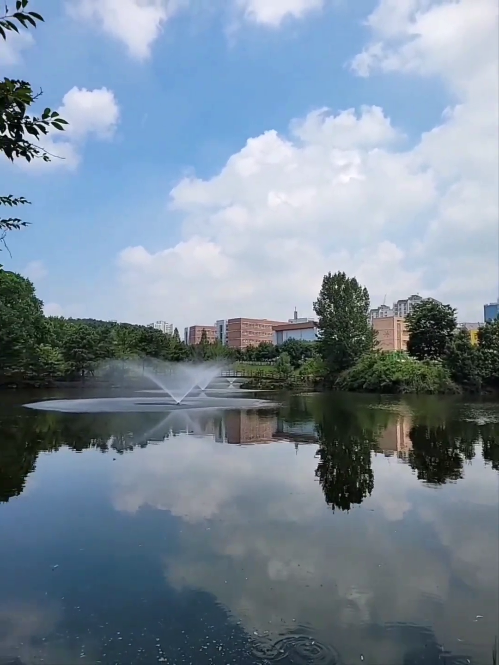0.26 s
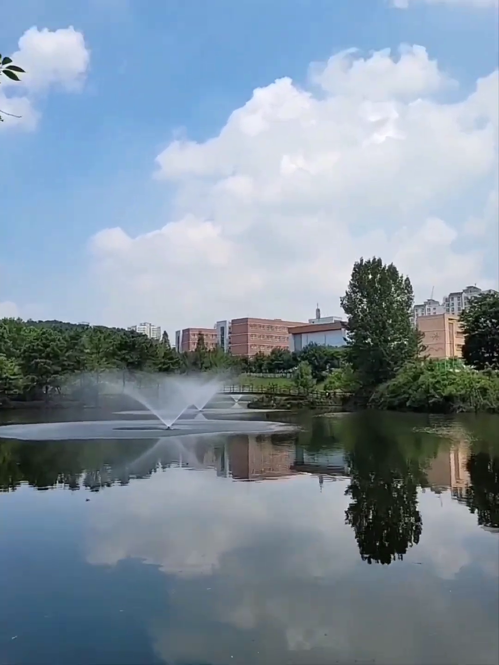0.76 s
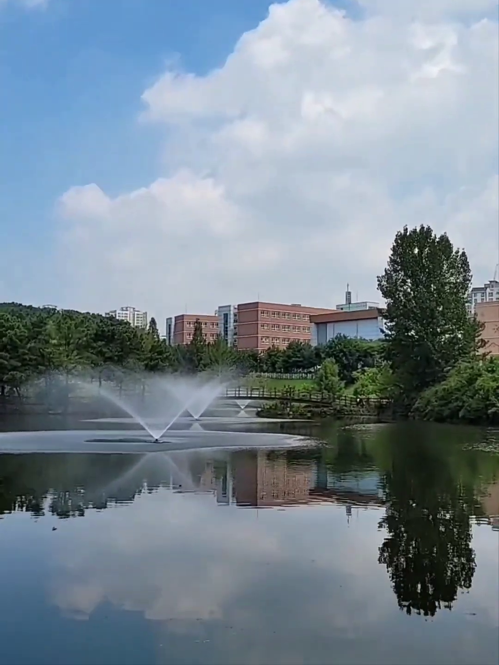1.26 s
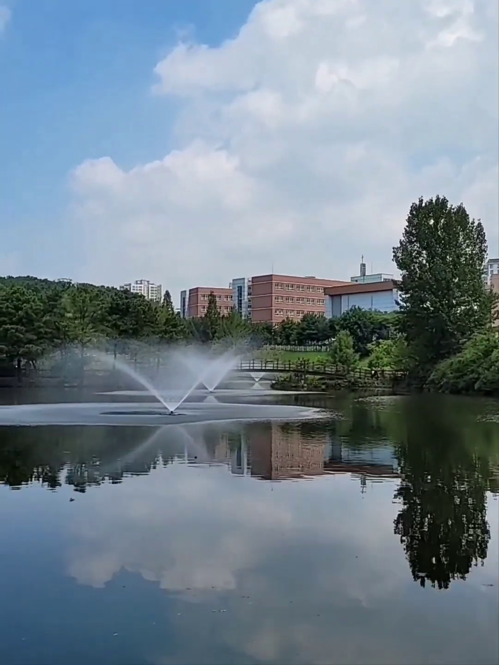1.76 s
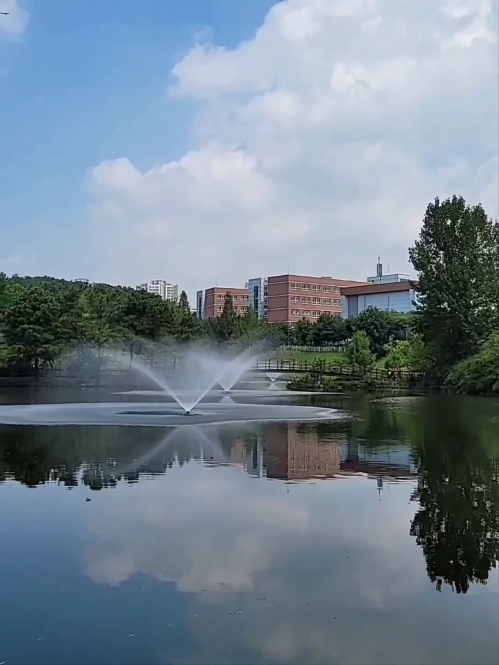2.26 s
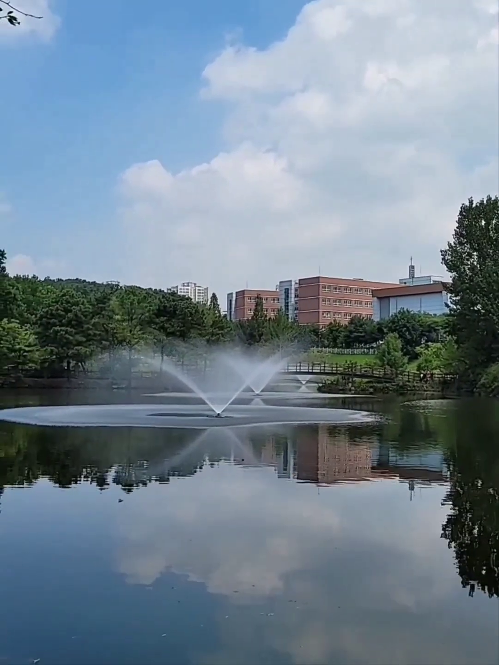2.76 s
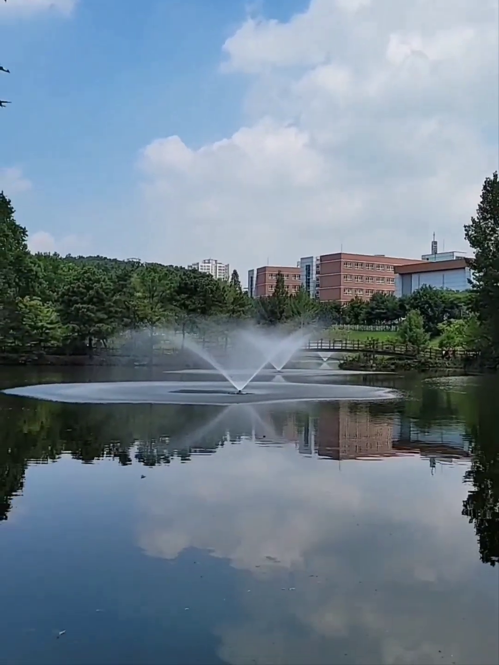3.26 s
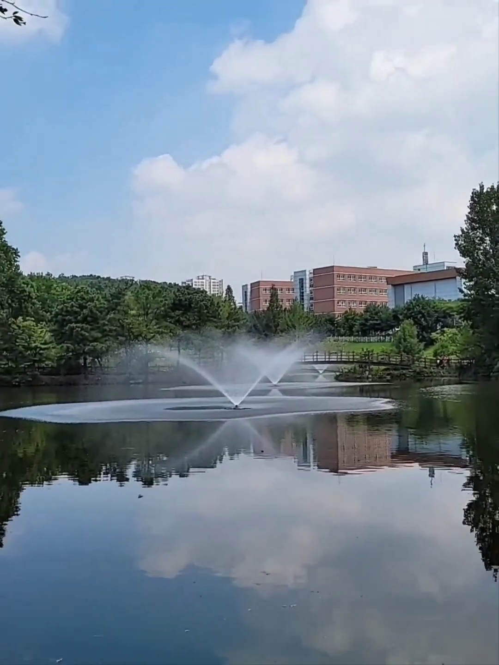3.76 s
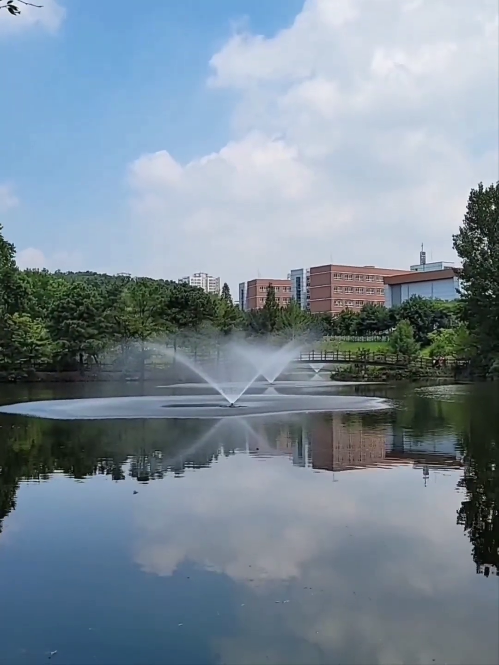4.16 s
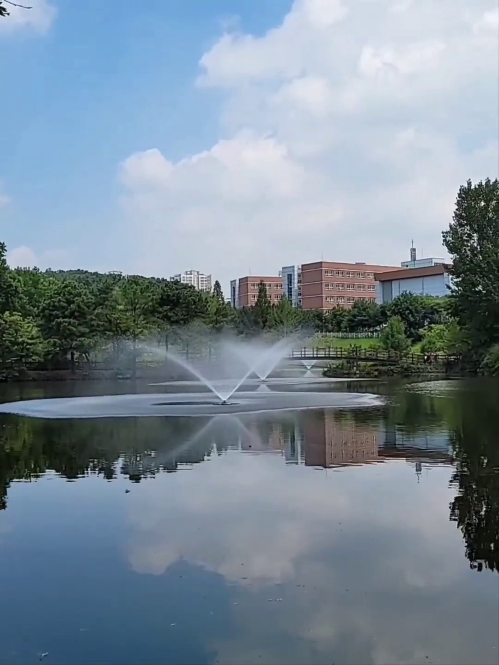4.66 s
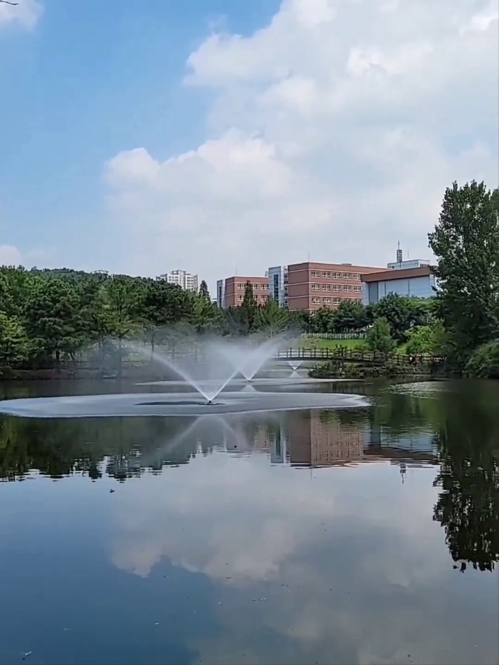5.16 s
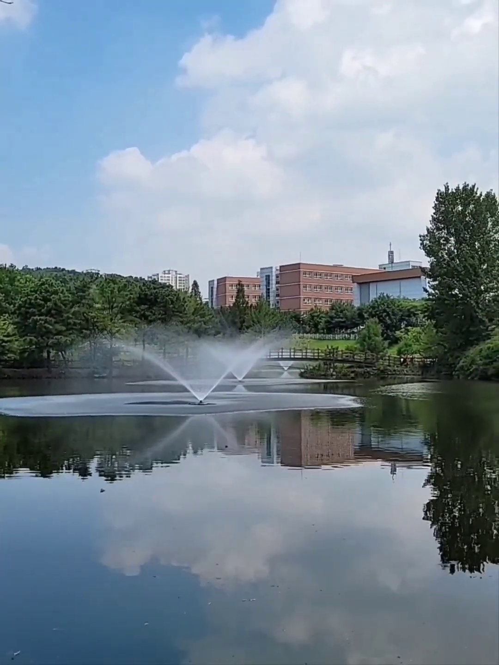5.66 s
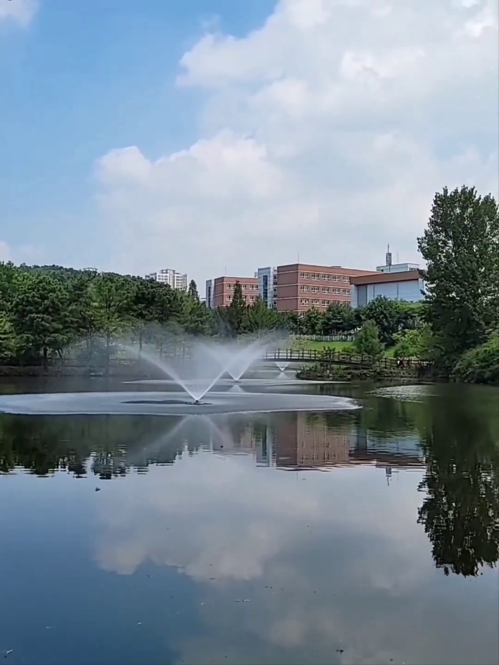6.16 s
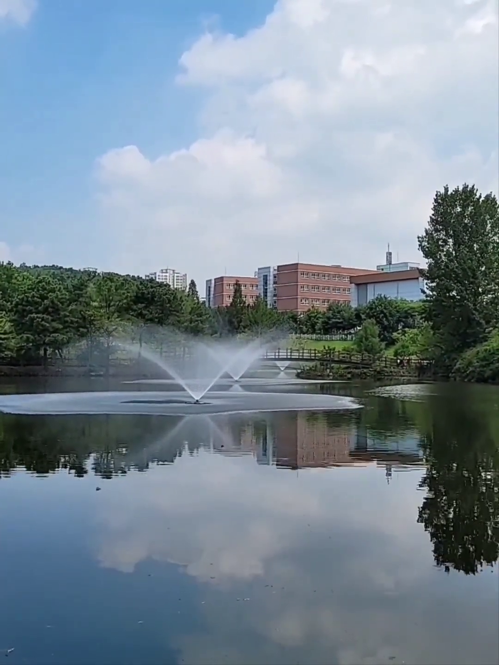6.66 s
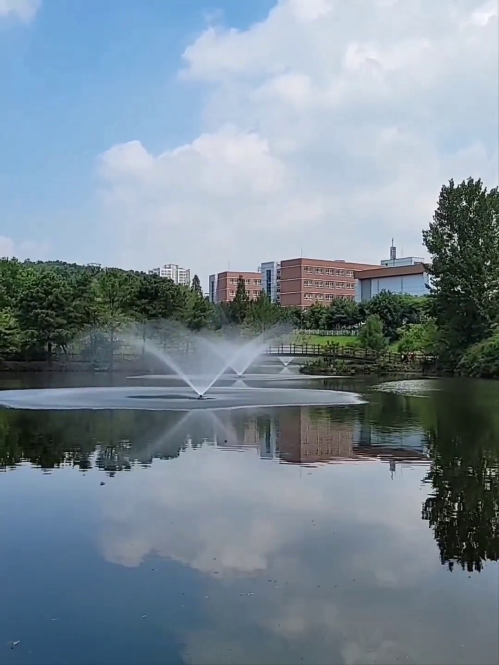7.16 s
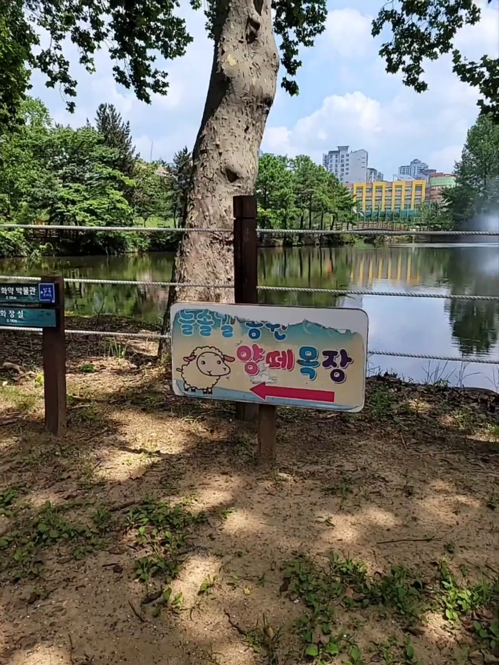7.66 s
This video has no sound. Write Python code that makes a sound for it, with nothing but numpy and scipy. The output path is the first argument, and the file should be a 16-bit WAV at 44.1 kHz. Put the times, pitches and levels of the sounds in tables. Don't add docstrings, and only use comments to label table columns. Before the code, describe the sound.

Outdoors at a summer pond, a close cicada rasps harshly and brightly, then becomes more ringing and pulsed, slows and stops after about six seconds. Far cicadas, soft fountain hiss, a low pump hum and town rumble remain, with wind thumps on a phone-like microphone. A short silence follows, then stronger leafy air and a quick run of dry twig cracks.

```python
import sys
import numpy as np
from scipy import signal
from scipy.fft import rfft, irfft
from scipy.io import wavfile
from scipy.ndimage import uniform_filter1d

SR = 44100
rng = np.random.default_rng(int(sys.argv[2]) if len(sys.argv) > 2 else 0)


def bounce(signal):
    frames = np.transpose(np.atleast_2d(signal))
    limited = np.clip(frames, -1, 1)
    pcm = np.round(limited * 32767).astype(np.int16)
    wavfile.write(sys.argv[1], SR, pcm)


def nominal_scale(level):
    x = np.asarray(level, float) / 20
    return 10 ** x


N = 349272
CUT_S, RESUME_S = 7.508, 7.651


def in_time(rows):
    s, *columns = np.transpose(rows)
    return [np.interp(np.arange(N) / SR, s, c) for c in columns]


def rms_one(x):
    return x / np.sqrt(np.mean(x ** 2) + 1e-20)


def drift(rate_hz):
    r = np.exp(-80 * np.pi * rate_hz / SR)
    slow = signal.lfilter([1], [1, -2 * r, r * r], rng.standard_normal(N // 40 + 2002))[2000:]
    return np.interp(np.arange(N) / 40, np.arange(len(slow)), rms_one(slow))


def coloured(x, spectrum):
    hz, db = np.transpose(spectrum)
    bins_hz = np.fft.rfftfreq(N, 1 / SR) + 1
    gain_db = np.interp(np.log(bins_hz), np.log(hz), db, left=-90, right=-90)
    return rms_one(irfft(rfft(x) * nominal_scale(gain_db), N))


def resonate(x, hz, width_hz):
    r = np.exp(-np.pi * width_hz / SR)
    poles = [1, -2 * r * np.cos(2 * np.pi * hz / SR), r * r]
    return signal.lfilter([(1 - r * r) / 2, 0, (r * r - 1) / 2], poles, x + 1e-18)


def puffs(events, cycles):
    out = np.zeros(N)
    for (s, db, hz), phase in zip(events, rng.uniform(0, 2 * np.pi, len(events))):
        i = np.arange(int((s - .05) * SR), min(int((s + .05) * SR), N))
        turns = hz * (i / SR - s)
        out[i] += nominal_scale(db) * np.exp(-(turns / cycles) ** 2) * np.cos(2 * np.pi * turns + phase)
    return out


SONG_END_S = 6.255
PULSES_DB = [4, -1.5, 3, -3, -5, -11]
RIBS_DB = [0, -1.5, -4]


def rib_clicks():
    t = np.arange(N) / SR
    tiring_s, settle_s = 3.0, (3.3, 4.7)
    tired = np.clip((t - tiring_s) / (SONG_END_S - tiring_s), 0, 1)
    cycles_hz = 45.7 - 10.2 * tired ** 4.0
    turns = np.cumsum(cycles_hz * (1 + .003 * drift(2.5))) / SR
    beat = np.arange(int(turns[-1]) * 17)
    pulse = beat % 17 // 3
    rib = beat % 17 % 3
    start = np.interp((beat - rib) / 17, turns, np.arange(N))
    loose_ms = np.interp(t, settle_s, (.065, .011))[start.astype(int)]
    rib_hz = 780
    at = start + SR * (rib / rib_hz + loose_ms / 1000 * rng.standard_normal(len(beat)))
    at = np.clip(at, 0, N - 1).astype(int)
    contrast = np.interp(t[at], settle_s, (.55, 1.15))
    click_db = np.array(PULSES_DB)[pulse] * contrast + np.array(RIBS_DB)[rib]
    force = np.zeros(N)
    force[at] = nominal_scale(click_db) * (at < SONG_END_S * SR)
    return force, at, pulse


# centre in Hz, width in Hz, level in dB.
TYMBAL = [(3531, 490, -4.5), (4295, 1030, -4), (5135, 1230, 1), (6240, 740, -6), (6780, 1600, -1)]
# centre in Hz, width in Hz, level in dB.
OVERTONES = [(9140, 1400, -4), (10660, 1550, -0.5), (11320, 1200, -0.5), (12700, 3000, -15)]
# centre in Hz, width in Hz, level in dB.
BELLY = [(5460, 330, 0), (5180, 160, -7), (5680, 100, -10), (9300, 80, -14), (6270, 80, -14),
         (3960, 90, -16), (7150, 80, -16), (8050, 100, -18), (3340, 70, -17)]
# time in seconds, level in dB.
EFFORT = [(0, -28), (1.5, -29), (2.2, -27.5), (3.1, -29), (3.6, -28.5), (4.2, -31), (4.9, -33), (6.25, -33)]


def cicada(scatter_db, scatter_s):
    t = np.arange(N) / SR
    force, at, pulse = rib_clicks()
    keep = np.exp(-2 / (scatter_s * SR))
    power = signal.lfilter([1 - keep], [1, -keep], force ** 2, zi=[np.mean(force ** 2)])[0]
    lingering = np.sqrt(power)

    def struck(modes, spread, wet_db):
        out = 0
        for hz, width_hz, db in modes:
            noise = rng.standard_normal(N)
            habit = np.zeros(N)
            habit[at] = rng.choice([-1, 1], 6)[pulse]
            blows = force * (habit + spread * noise) + nominal_scale(wet_db) * lingering * noise
            once = resonate(blows, hz, 1.5 * width_hz)
            out = out + nominal_scale(db) * rms_one(resonate(once, hz, 1.5 * width_hz))
        return rms_one(out)

    settle_s = (3.3, 4.7)
    ring_db = np.interp(t, settle_s, (-13, -1.5))
    overtone_db = np.interp(t, settle_s, (-5.5, -5))
    effort_db, = in_time(EFFORT)
    song = struck(TYMBAL, 0.44, scatter_db)
    song = song + nominal_scale(overtone_db) * struck(OVERTONES, 0.58, scatter_db)
    song = song + nominal_scale(ring_db) * struck(BELLY, 0.13, wet_db=-15)
    high_pass = signal.butter(6, 3100, "high", fs=SR, output="sos")
    return signal.sosfilt(high_pass, song * nominal_scale(effort_db - 1.5))


# start in seconds, peak in dB, pitch in Hz, length in seconds, woody share.
TWIG = [
    (7.804, -31, 1950, .002, 1.2),
    (7.8325, -27, 12000, .003, .3),
    (7.8355, -26, 5500, .003, .4),
    (7.843, -24, 2200, .0007, 1.5),
    (7.857, -27, 6000, .0007, .4),
    (7.860, -21, 4600, .0015, 1.2),
    (7.8625, -11, 6300, .0014, 1.6),
    (7.8643, -14, 4600, .002, .3),
    (7.872, -27, 4700, .003, .2),
]


def twig():
    out = np.zeros(N)
    t = np.arange(int(.03 * SR)) / SR
    for s, db, hz, length_s, woody in TWIG:
        burst = rng.standard_normal(len(t)) * np.exp(-t / max(length_s, 3e-4)) * (1 - np.exp(-t / 0.00065))
        centre = 1.7 * resonate(burst, hz, 1800)
        low = woody * resonate(burst, 2000, 1500)
        top = 1.5 * (hz > 3000) * resonate(burst, 12500, 4000)
        burst = centre + low + top
        i = int((s - .0004) * SR)
        out[i:i + len(t)] += (nominal_scale(db + 2.0) * burst / np.abs(burst).max())[:N - i]
    out = signal.sosfilt(signal.butter(8, 15500, fs=SR, output="sos"), out)
    return out - 0.64 * resonate(out, 8700, 2500)


# frequency in Hz, level in dB per Hz.
CHORUS = [(1530, -23), (2600, -16), (2900, -11), (3280, -7.5), (3570, -3.5), (5310, 2), (7040, -2),
          (8870, -10.5), (11800, -5), (13500, -7), (14600, -9)]


def chorus():
    level_db = -35.5 + 0.19 * drift(2.5) + .5 * drift(6.9)
    return nominal_scale(level_db) * coloured(rng.standard_normal(N), CHORUS)


# frequency in Hz, level in dB per Hz.
SPRAY = [(250, -31), (400, -2), (560, -5), (900, -6), (1400, -9), (1780, -10), (2020, -5), (2230, -13.5),
         (2500, -14.5), (2900, -12.5), (3600, -42.5)]


def fountain(drops_per_s):
    sizes = nominal_scale(1.5 * np.minimum(rng.exponential(1, N), 5))
    drops = (rng.random(N) < drops_per_s / SR) * sizes * rng.choice([-1, 1], N)
    since_turn_s = np.arange(N) / SR - 3.1
    breeze_db = -5.0 + np.maximum(0.7 * since_turn_s, -0.44 * since_turn_s)
    return nominal_scale(-43 + breeze_db + .6 * drift(3.0)) * coloured(drops, SPRAY)


# time in seconds, peak in dB, pitch in Hz.
PLOPS = [
    (4.468, -43, 790),
    (4.497, -40, 993),
    (7.745, -45, 810),
    (7.805, -44, 845),
]


def plops():
    return puffs(PLOPS, cycles=9.7)


# frequency in Hz, level in dB rms, waver in dB.
HUM = [(359.6, -46.0, 0.7), (413.6, -61.5, 1)]


def pump():
    t = np.arange(N) / SR
    out = np.zeros(N)
    for hz, db, waver_db in HUM:
        out += np.sqrt(2) * nominal_scale(db + waver_db * drift(3.4)) * np.sin(2 * np.pi * hz * t)
    return out


# frequency in Hz, level in dB per Hz.
RUMBLE = [(13, -51.5), (22, -26.5), (38, -8.5), (54, -2.5), (91, -14), (119, -6), (200, -12), (330, -14),
          (430, -20.5), (730, -120)]


def town():
    return nominal_scale(-43) * coloured(rng.standard_normal(N), RUMBLE)


# time in seconds, peak in dB.
EDDIES = [(.254, -30.5), (.322, -32), (.613, -32), (2.006, -35), (2.72, -29.5), (2.748, -27.5),
          (2.775, -21), (2.892, -32.5), (3.155, -30), (3.183, -23.5), (3.209, -36), (3.299, -28),
          (3.673, -30), (4.033, -25.5), (4.073, -28), (4.1, -21.5), (4.177, -29), (4.199, -30),
          (4.838, -34), (5.34, -34), (5.867, -28), (5.899, -36), (6.341, -33), (6.403, -33), (6.449, -32),
          (6.577, -35), (6.807, -29.5)]
# time in seconds, peak in dB.
SHADE_EDDIES = [(7.69, -42), (7.78, -27.5), (7.822, -33), (7.841, -27.5), (7.884, -27), (7.894, -28),
                (7.917, -27)]


def eddies():
    out = np.zeros(N)
    for events, thump_hz in ((EDDIES, 58), (SHADE_EDDIES, 109)):
        pitches_hz = thump_hz * (1 + 0.1 * rng.standard_normal(len(events)))
        out += puffs([(s, db, hz) for (s, db), hz in zip(events, pitches_hz)], cycles=0.7)
    return out


def wind(level_db, low_hz, high_hz):
    lumps = rng.standard_normal(N) * nominal_scale(1.1 * drift(18.0))
    band = signal.butter(2, [low_hz, high_hz], "band", fs=SR, output="sos")
    return nominal_scale(level_db) * rms_one(signal.sosfilt(band, lumps))


# time in seconds, level in dB.
AIR = [(0, -51), (.4, -42), (.9, -46.5), (3.5, -43.5), (3.85, -62.5), (4.3, -47.5), (6.4, -45.5),
       (6.9, -50), (7.5, -49)]


def pond_wind():
    level_db, = in_time(AIR)
    return wind(level_db - 1.5, 38, 80)


# frequency in Hz, level in dB per Hz.
SHADE_AIR = [(150, -36), (250, -11), (370, -4), (451, -12), (650, -15.5), (982, -16), (2780, -17),
             (3660, -20.5), (4280, -14), (7300, -19.5), (8800, -28), (10500, -24), (15700, -25.5)]


def shade_wind():
    fade_s = 0.036
    fade_db = -10 * np.clip(1 - (np.arange(N) / SR - RESUME_S) / fade_s, 0, 1)
    air = nominal_scale(-39.5 + fade_db) * coloured(rng.standard_normal(N), SHADE_AIR)
    return wind(-44.5 + fade_db, 56, 170) + air


# frequency in Hz, step in dB re loudness.
ROUNDING = [(250, -35.5), (500, -24.5), (800, -23.0), (1200, -22), (2000, -21.5), (3000, -20),
            (8000, -21.0), (12500, -20.0), (13900, -18.5), (14600, -20)]


def phone_rounding(x):
    n, k = np.arange(2048)[:, None], np.arange(1024)
    line_hz = k * SR / 2048
    window = np.sin(np.pi * (n + .5) / 2048)
    basis = window * np.cos(np.pi / 1024 * (n + 512.5) * (k + .5)) / np.sqrt(512)
    lead = 809
    halves = np.pad(x, (lead, 2048 + (-N - lead) % 1024), mode="reflect").reshape(-1, 1024)
    lines = np.hstack([halves[:-1], halves[1:]]) @ basis
    loudness = uniform_filter1d(np.sqrt(np.mean(lines[:, 40:] ** 2, axis=1)), size=9)[:, None]
    usual = nominal_scale(-28.5)
    loudness = usual * (loudness / usual) ** .72
    hz, db = np.transpose(ROUNDING)
    band_db = 1.8 * rng.standard_normal((len(lines), 64)).repeat(16, axis=1)
    step_db = np.interp(np.log((k + .5) * SR / 2048), np.log(hz), db) + band_db
    step = 10 * loudness * nominal_scale(step_db)
    rounded = np.sign(lines) * np.floor(np.abs(lines) / step + .36) * step
    frames = (rounded * (line_hz < 14590)) @ basis.T
    out = np.pad(frames[:, :1024], ((0, 1), (0, 0))) + np.pad(frames[:, 1024:], ((1, 0), (0, 0)))
    return out.ravel()[lead:lead + N]


def scene():
    t = np.arange(N) / SR
    thumps = eddies() + plops()
    pond = cicada(scatter_db=-0.5, scatter_s=0.016) + chorus() + fountain(drops_per_s=12000)
    pond = phone_rounding(pond + pump() + town() + thumps + pond_wind())
    smear = nominal_scale(-34.5) * (t < CUT_S + .02)
    snap = twig()
    shade = shade_wind() + snap + thumps
    mid = pond * np.where(t < CUT_S, 1, smear) + shade * (t > RESUME_S)
    side = nominal_scale(-15) * resonate(snap, 13000, 3000)
    return mid + side * [[1], [-1]]


def top_cut(x):
    return signal.sosfilt(signal.butter(12, 15880, fs=SR, output="sos"), x)


def record(dry):
    return top_cut(dry)


dry = scene()
out = record(dry)
bounce(out)
```